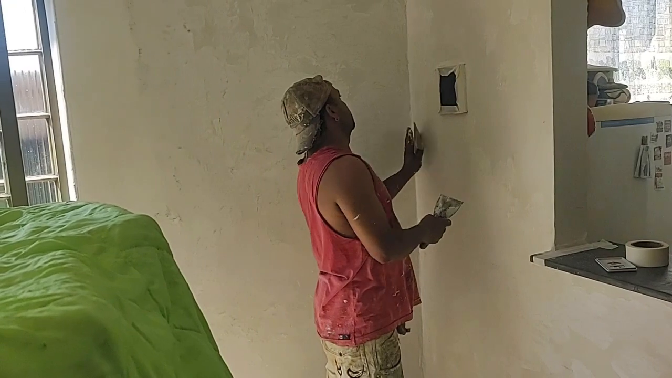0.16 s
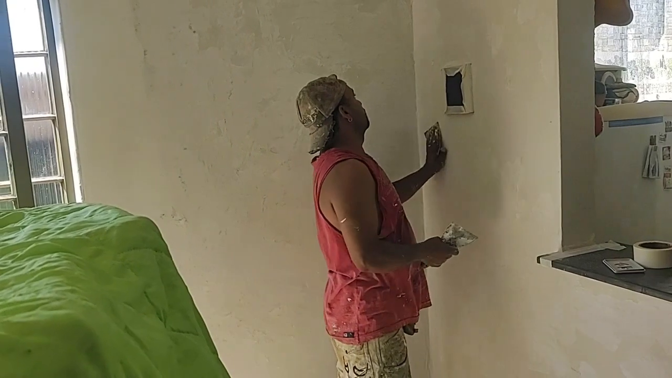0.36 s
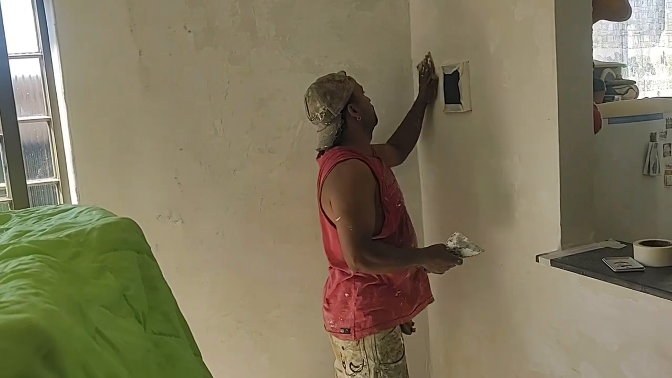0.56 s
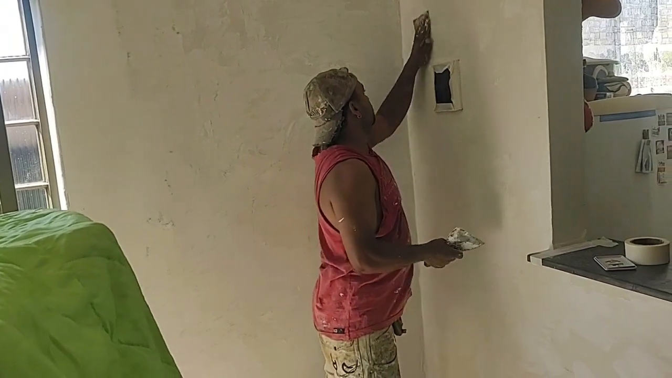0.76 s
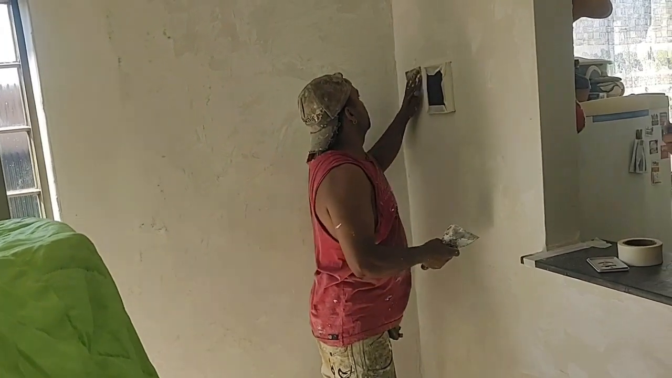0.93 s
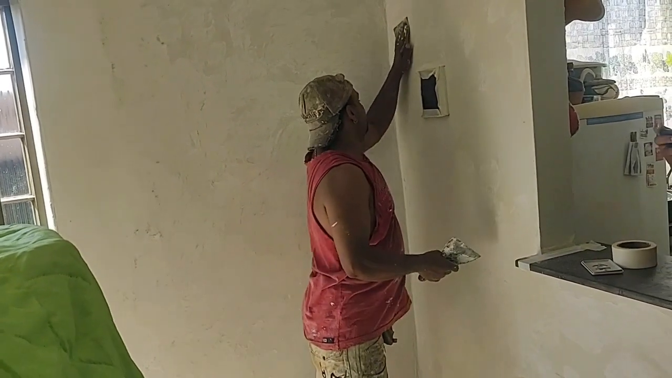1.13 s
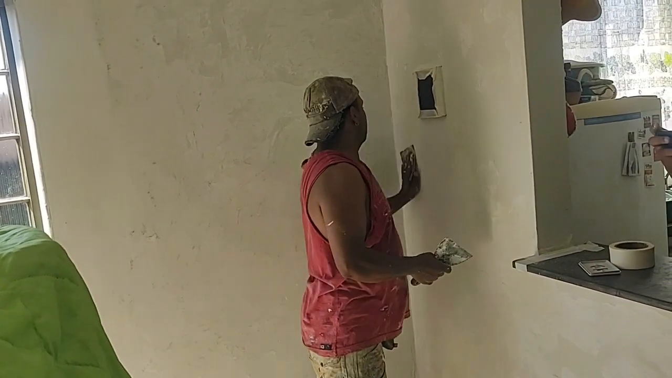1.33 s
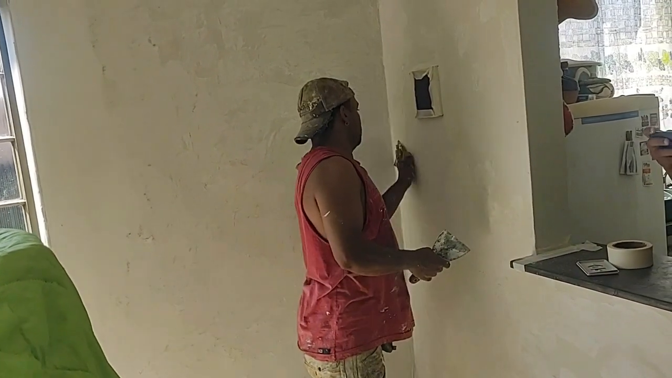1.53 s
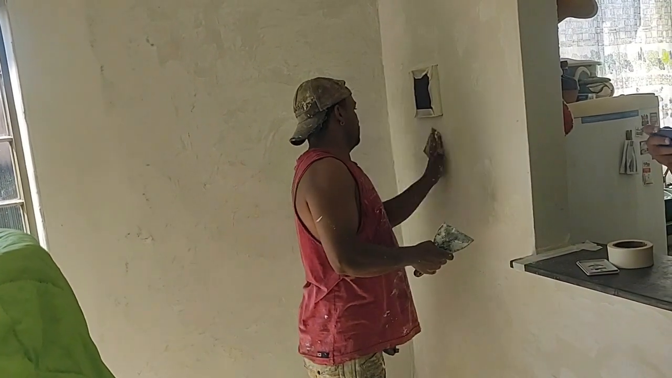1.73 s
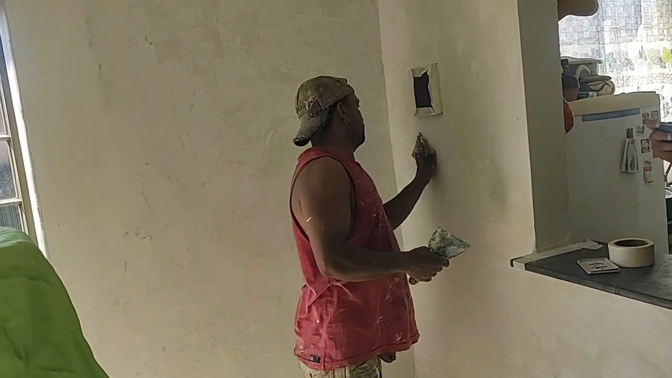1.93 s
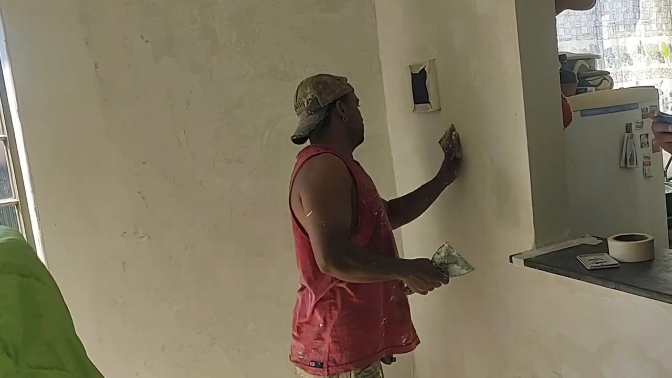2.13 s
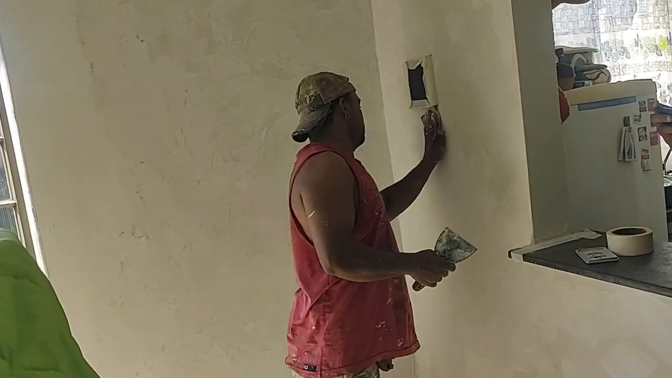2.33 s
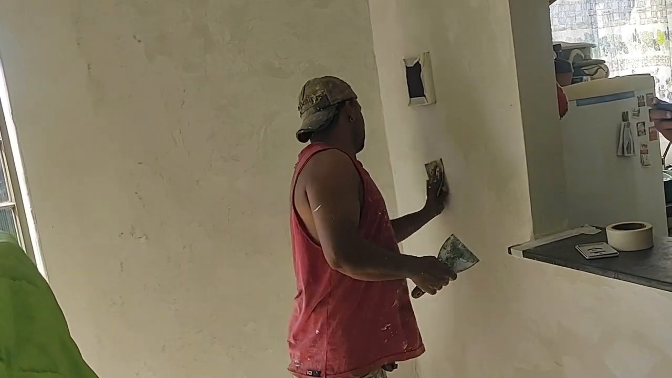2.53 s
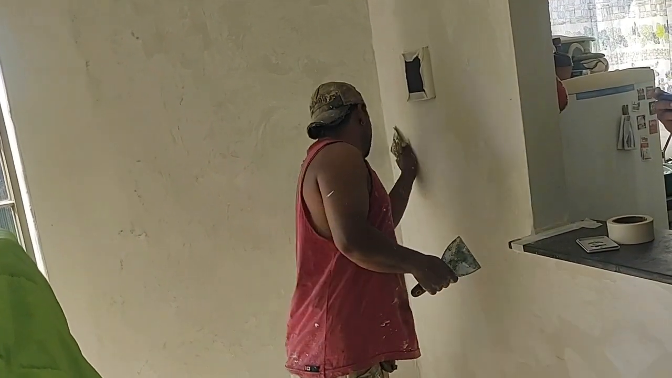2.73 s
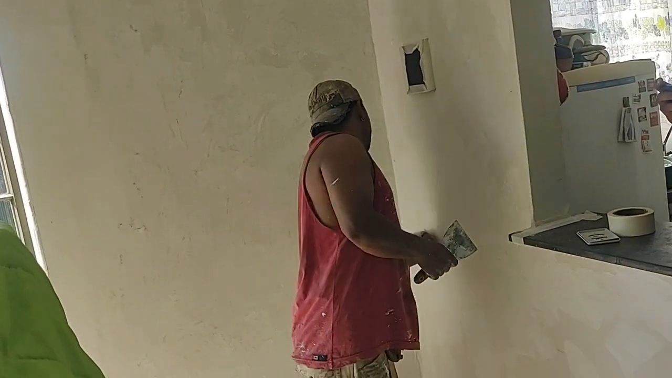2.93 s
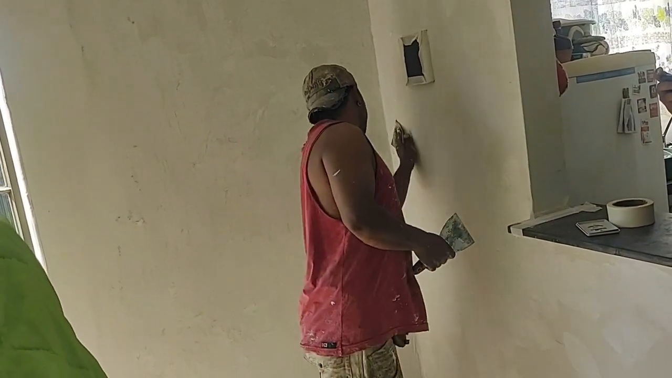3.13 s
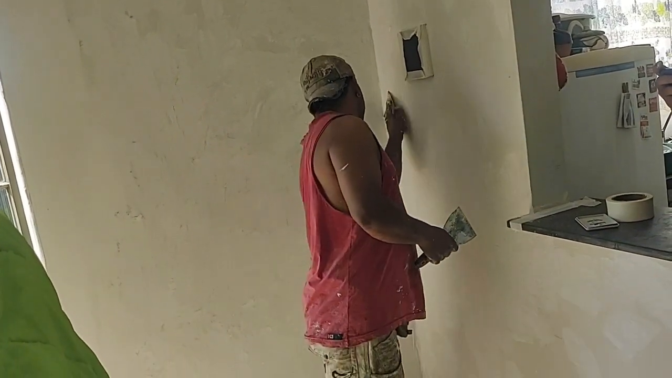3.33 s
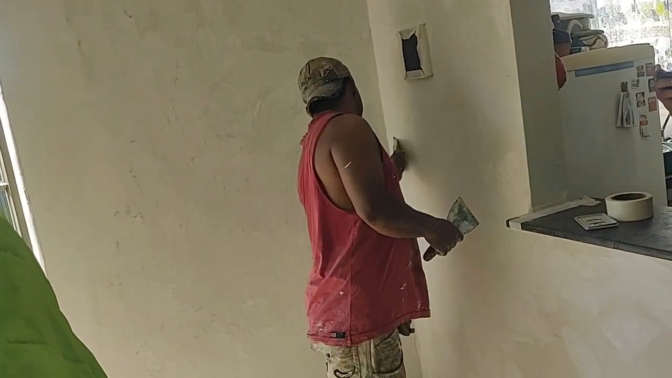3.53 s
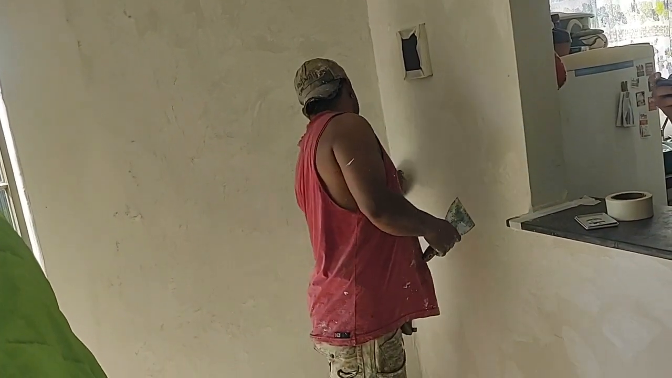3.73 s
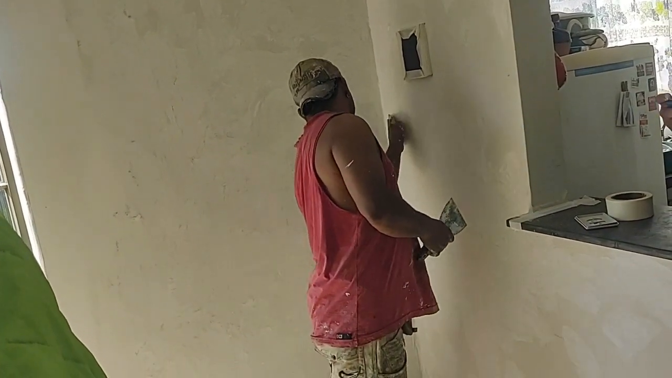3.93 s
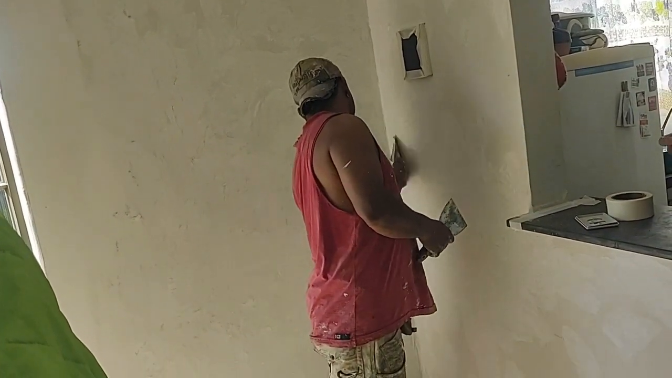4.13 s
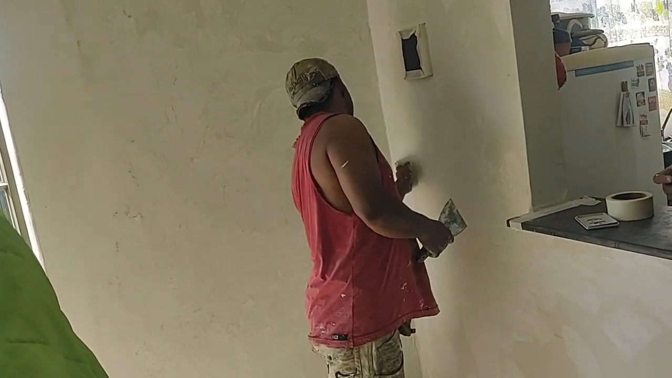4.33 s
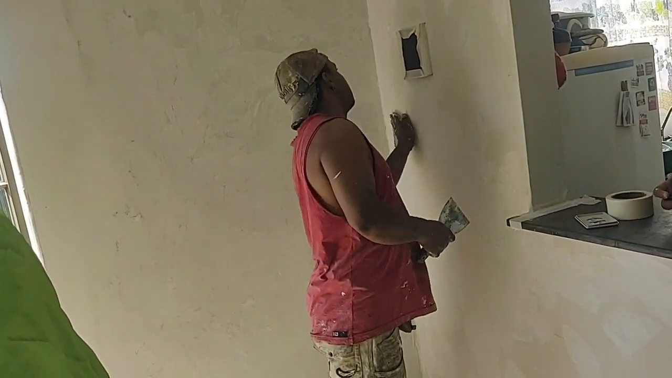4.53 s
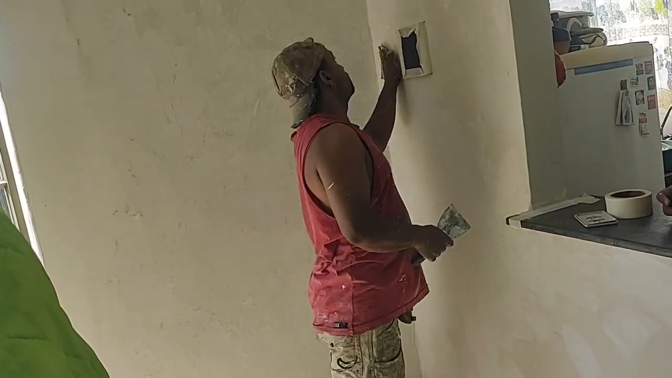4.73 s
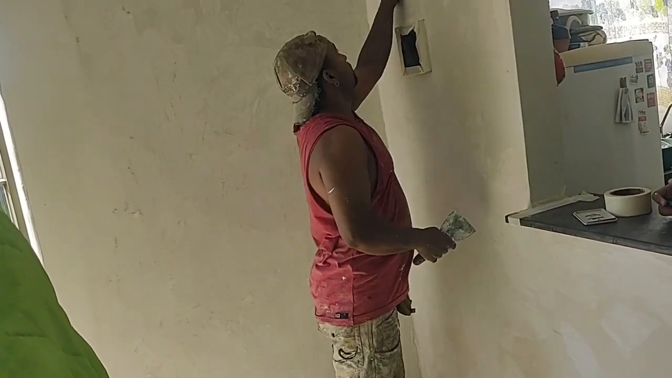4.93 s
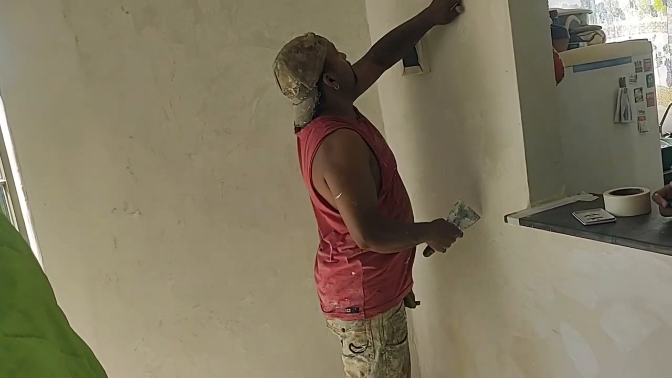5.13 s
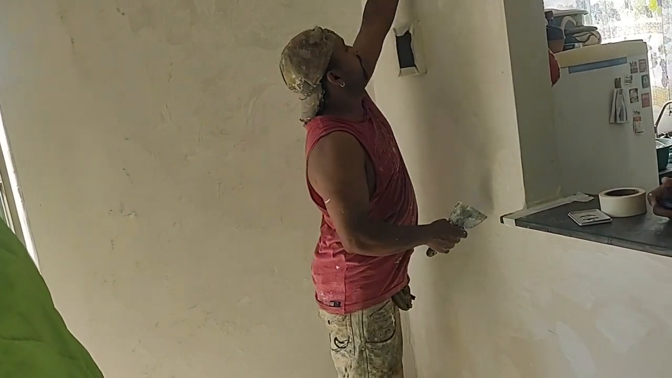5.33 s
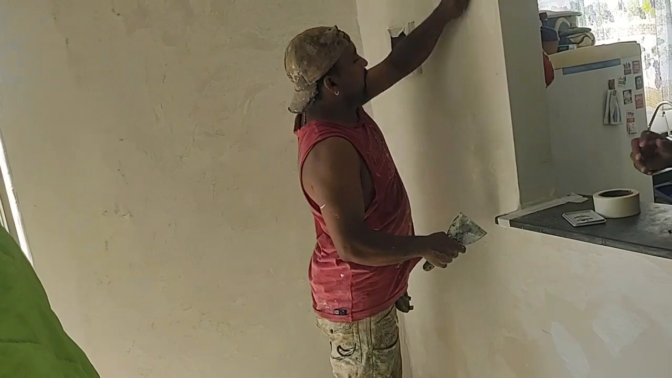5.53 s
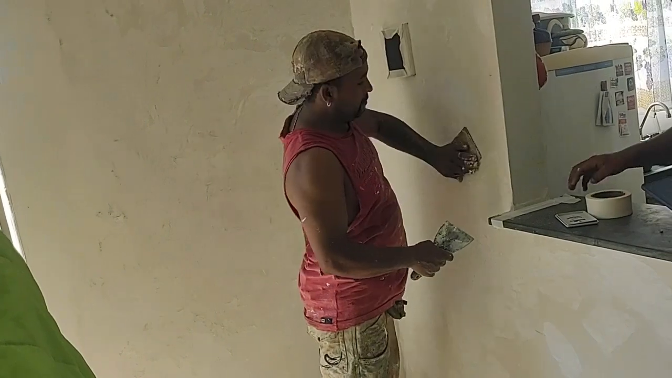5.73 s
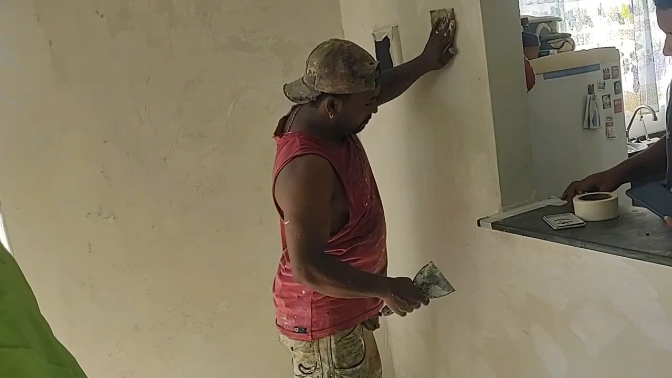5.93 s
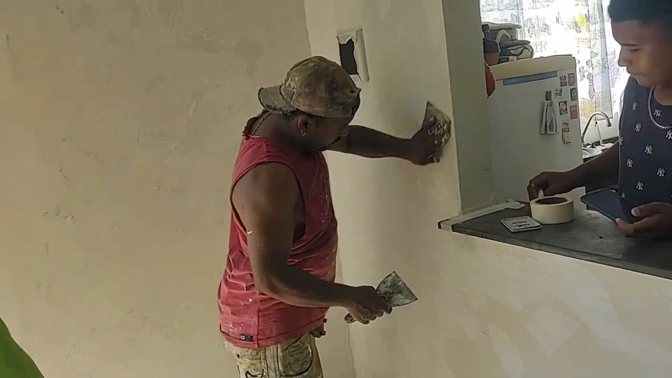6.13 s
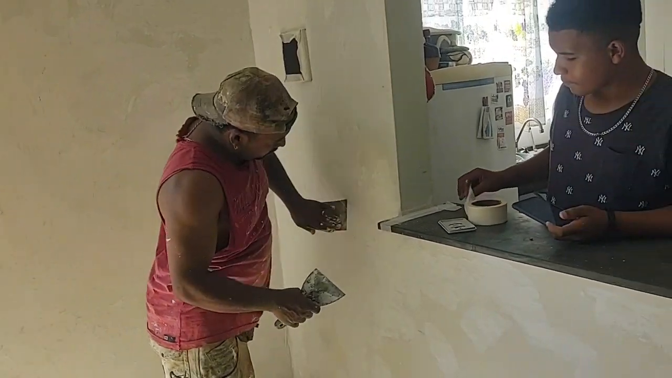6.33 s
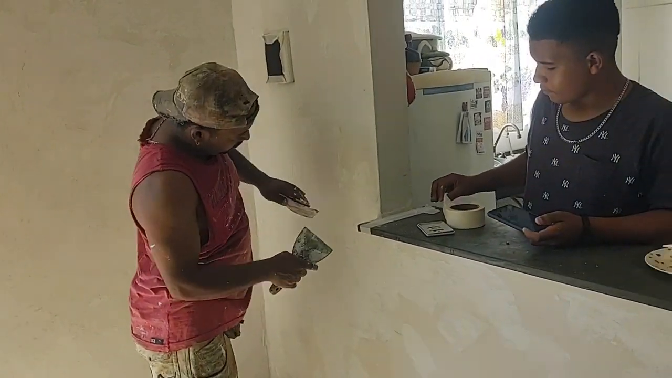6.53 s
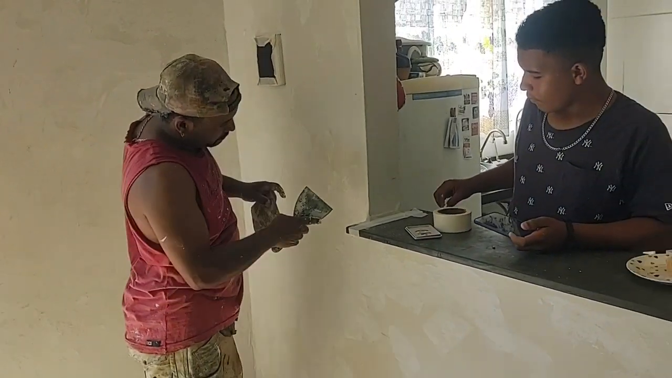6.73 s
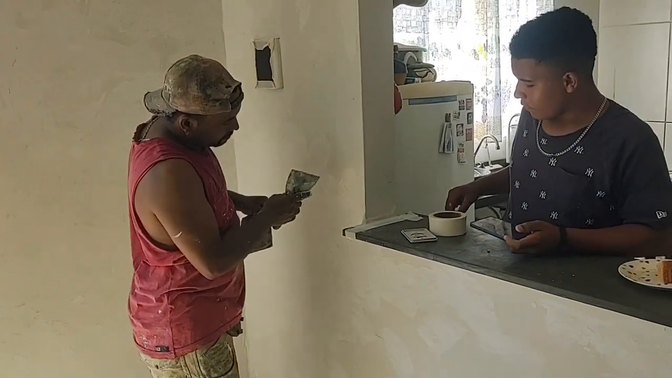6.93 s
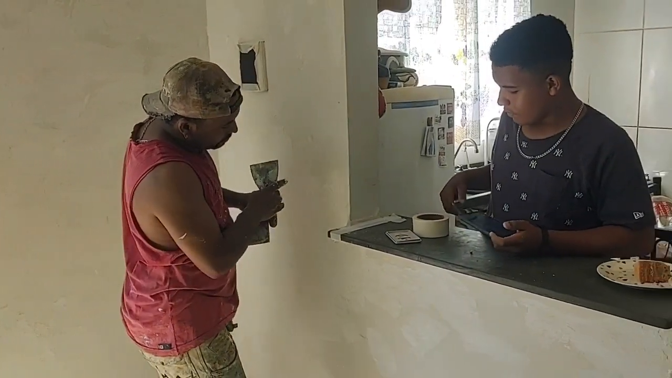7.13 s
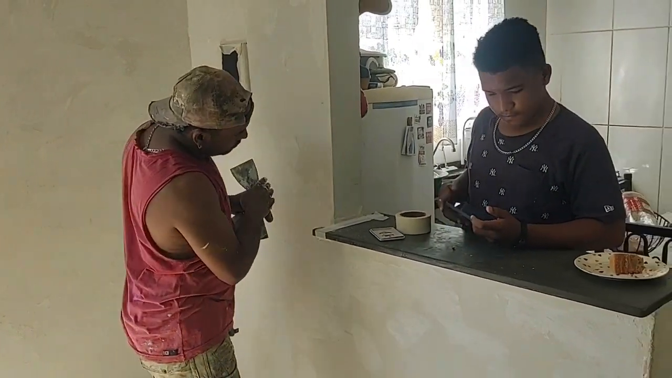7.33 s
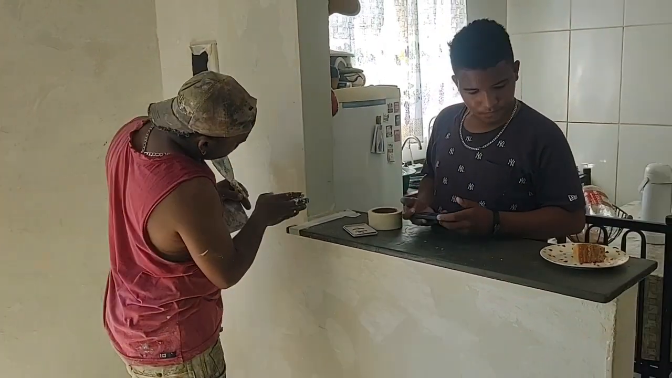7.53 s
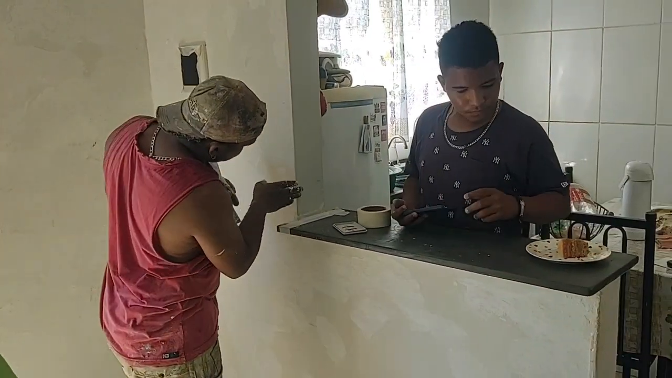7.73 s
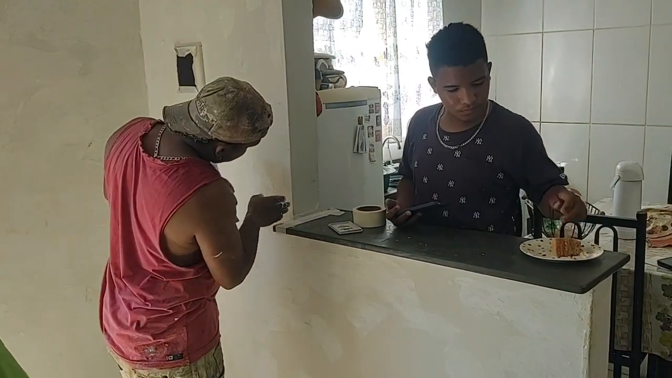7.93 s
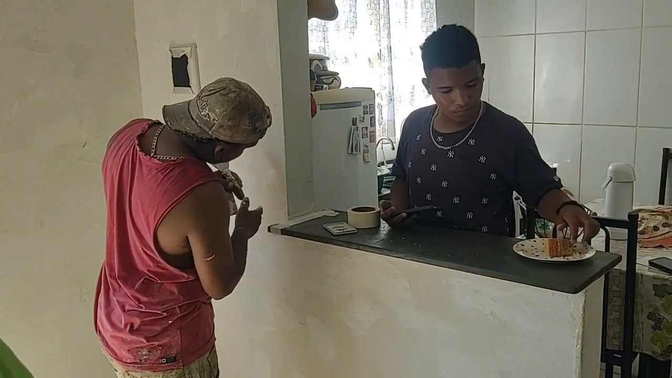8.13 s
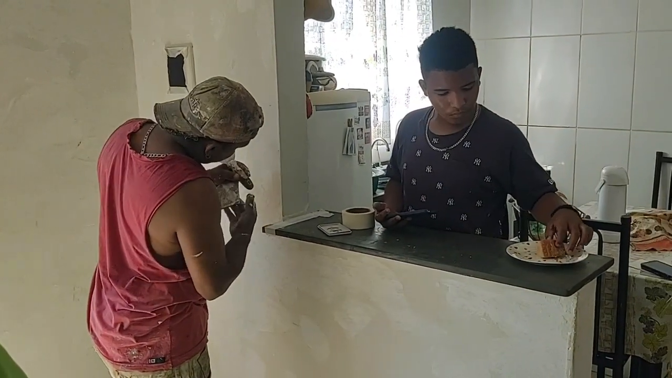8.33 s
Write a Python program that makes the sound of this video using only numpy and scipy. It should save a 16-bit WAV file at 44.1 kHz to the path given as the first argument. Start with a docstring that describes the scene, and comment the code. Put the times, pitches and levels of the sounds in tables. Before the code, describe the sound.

Sandpaper rubbed by hand over a plastered wall in quick gritty strokes, then the sheet crackles and is shaken in a small hard room.

```python
"""Small hard room: a man sands a plastered wall by hand, a few metres from a handheld phone.
Clicks of grit, split into bands, make the strokes; noise bursts make snags; hard pushes drum hollow resonances.
He fingers the sheet (crackle) at the start and after sanding, when he also shakes it.
Low knocks, from fingers bumping the phone and once ringing in the room, are damped sines.
Echoes, a bass boom, faint air and two late whistles complete it."""
import sys
import numpy as np
from scipy import signal
from scipy.fft import rfft, irfft, next_fast_len
from scipy.io import wavfile
from scipy.ndimage import uniform_filter1d

SR = 44100
rng = np.random.default_rng(int(sys.argv[2]) if len(sys.argv) > 2 else 0)


def persist_wave(psi):
    """Save psi, clipped to +-1, as 16-bit WAV."""
    counts = np.round(np.clip(psi, -1, 1) * 32767).astype(np.int16)
    wavfile.write(sys.argv[1], SR, np.atleast_2d(counts).T)


N = 369116

# House air spectrum: [hz, relative_db]
AIR_SPECTRUM = [(18, -38), (30, -11), (102, 0.5), (219, -2.5), (277, -2.5), (455, -6), (1360, -12.5),
                (2910, -9.5), (3490, -11.5), (5040, -14), (15500, -24.5)]
AIR_DB = -71.5
# Fingers shifting on the loose sheet: [start_s, length_s, level_db]
GRIPS = [(0.0, 0.17, -66), (0.263, 0.16, -67.5), (6.43, 0.33, -60), (6.682, .24, -55.5),
         (6.977, 0.26, -59.5), (7.284, 0.22, -63), (7.5, 0.16, -74), (7.82, 0.19, -70.5),
         (8.1, 0.21, -69.5)]
GRIP_RISE_S = 0.03
# Sheet shaken out: [start_s, flap_db, thump_db, rise_s, t60_s, boom_db]
SHAKES = [(6.711, -46, -63, .005, 0.22, -82), (6.906, -43.5, -50.5, 0.00091, 0.47, -55),
          (7.283, -42, -42.5, 0.01, 0.21, -64), (7.334, -76, -61.5, .005, 1, -47),
          (7.53, -79, -54.5, 0.0052, 0.17, -68)]
# Crackle spectrum of the loose sheet: [hz, relative_db]
RUSTLE_SPECTRUM = [(180, -20), (300, -13.5), (360, -20.5), (708, -11.5), (1140, -4.5), (1440, -6.5),
                   (2690, 2.5), (3280, -3.5), (6680, -5.5), (15500, -23)]
# Soft low knocks: fingers bumping the phone, and at 7.529 s one ringing knock in the room:
# [start_s, level_db, pitch_hz, t60_s]
KNOCKS = [(0.101, -26.5, 158, 0.014), (0.185, -45.5, 92, 0.056), (3.149, -24.5, 113, 0.028),
          (3.171, -35, 130, 0.091), (3.226, -23, 160, 0.024), (3.262, -26.5, 94, 0.087),
          (3.321, -41, 140, .12), (3.873, -38, 129, 0.037), (7.529, -51, 323, .25),
          (7.841, -40, 127.6, 0.029)]
# Paper catching on a bump or creasing: [start_s, level_db, ring_hz, ring_share_db]
SNAGS = [ (0.268, -40, 2860, -24), (0.43, -47.5, 1440, -6.5), (0.764, -20.5, 1540, -12),
         (0.912, -22, 1290, -6.5), (0.941, -17, 2470, -10), (1.023, -12, 1440, -21),
         (1.237, -17, 2560, -11), (1.786, -4, 2600, -33), (1.801, -25, 595, -3), (2.128, -31, 1520, -1),
         (2.639, -26, 960, -1.5), (2.756, -20.5, 1140, -1), (2.785, -20, 1540, -3), (2.96, -20.5, 2850, -6),
         (3.217, -16.5, 2250, -15.5), (3.59, -24, 1540, -17.5), (3.597, -44.5, 780, -3),
         (4.006, -43, 1900, -6), (4.581, -39, 1600, -3.5), (4.788, -26.5, 1820, -13),
         (5.062, -32, 2100, 14), (6.719, -41, 2590, -23), (6.984, -33, 7000, -13), ]
# Arm sweeps, turn to turn; last three columns relative to rasp:
# [start_s, length_s, run_up_s, rasp_db, swell_db (start to end), hiss_db, scrape_db, bite_db]
STROKES = [ (0.545, 0.29, 0.067, -34.5, -2.5, 3.5, -14, -4.5),
           (0.796, 0.22, 0.042, -33, -2.5, 2, -10, -4.5), (1.01, 0.2, 0.0092, -34, -4.5, 0.5, -8.5, -5),
           (1.206, 0.097, 0.044, -35.5, 4, 3, -3, -8), (1.283, 0.26, 0.053, -33, -1, 3, -11, -5),
           (1.573, 0.24, 0.055, -39, -13, 4.5, -9.5, -6), (1.72, 0.23, 0.058, -32.5, -6, 1.5, -10, -6.5),
           (1.924, 0.16, .035, -38, -10, 3, -10, -9), (2.11, 0.22, 0.12, -34, -2.5, 2.5, -11, -10.5),
           (2.287, 0.13, 0.036, -33, 11.5, 1, -9.5, -8), (2.436, 0.32, 0.042, -37.5, -0.5, 5, -13.5, -4),
           (2.734, .11, 0.032, -29, -10, 1, -9.5, -8), (2.812, 0.25, 0.026, -36, -7, 4, -13, -5.5),
           (3.035, 0.26, 0.052, -40, 0.5, 4.5, -7.5, -9.5), (3.425, .28, 0.053, -52, 5.5, 3.5, -7, -12),
           (3.879, 0.19, 0.061, -58.5, 1.5, 0, -6, -7), (4.114, 0.19, 0.16, -48.5, 2.5, 3, -13, -12),
           (4.455, 0.17, 0.02, -60.5, -6, -1.5, -37, -3.5), (4.56, 0.44, 0.13, -43, 6, 1, -12.5, -21),
           (4.996, 0.22, 0.042, -28, -0.5, -.5, -19, -10.5), (5.232, 0.2, 0.039, -28, -2.5, 0, -16.5, -2.5),
           (5.445, 0.41, 0.074, -28.5, -1.5, 1.5, -16.5, -5.5),
           (5.882, 0.21, 0.054, -29.5, -13.5, 0, -16, -2.5), (6.127, 0.23, 0.062, -30.5, -12, 5, -13, -4.5),
           ]
# Grit-on-plaster spectrum: [hz, relative_db]
GRIT_SPECTRUM = [(59, -52), (100, -27.5), (166, -23.5), (275, -24), (326, -23.5), (429, -26), (589, -18),
                 (640, -14.5), (1040, -10.5), (1260, -12), (2580, 2.5), (3690, -1), (4660, -4.5),
                 (7410, -7), (15500, -23.5)]
# The hand brakes before each turn: weaker, duller sound
BRAKE_S, TURN_DB, TURN_HISS_DB = 0.067, -11, -1.5
# Past the stroke's ends the sheet is off the wall; loss grows with the square of the excess slowness
LIFT_DB = -2
# Along a stroke the hiss grows with hand speed; the scrape changes slightly against the rasp
HISS_GROWTH_DB, SCRAPE_GROWTH_DB = 3.5, 0.5
# Hard pushes on the wall: [start_s, thud_db, t60_s, boom_db]
PUSHES = [(0.911, -40.5, 0.32, -72), (1.08, -56.5, 0.23, -75), (1.795, -43.5, 0.63, -66),
          (2.41, -55, 0.37, -65), (2.645, -51, 0.22, -62), (2.762, -46.5, 0.79, -39),
          (5.22, -57, 0.14, -63.5), (6.132, -44.5, 0.37, -70), (6.206, -34, 0.083, -54.5)]
# Hollow resonances of wall and corner: [hz, width_hz, relative_db]
HOLLOWS = [(100, 27, -11), (156, 21, 4.5), (256, 48, -1.5), (323, 53, -1.5), (495, 75, -6.5),
           (647, 80, -10), (970, 340, -11.5)]
BOOM_HZ, BOOM_T60_S = 86, 0.5
# Faint high whistles: [start_s, length_s, pitch_hz, level_db]
WHISTLES = [(7.68, 0.15, 4730, -72.5), (7.853, 0.13, 6150, -70)]
# Colour difference of the two microphone ports: [hz, left_minus_right_db]
PORTS = [(100, -2), (500, -1), (1300, -2), (2600, -6), (3300, -1), (4000, 5), (7200, 6), (8700, 8.5),
         (10500, 8.5), (15000, 8)]
# Resonance subtracted from the right port
NOTCH_HZ, NOTCH_WIDTH_HZ, NOTCH_SHARE_DB = 13000, 2200, -1.5
TOP_HZ = 15800


def undb(db):
    """Decibels to gain."""
    return 10 ** (np.asarray(db) / 20)


def unit(x):
    """Scale to rms 1."""
    return x / np.sqrt(np.mean(x ** 2))


def colour(x, points):
    """Minimum-phase filter through (hz, db) points, built by folding the cepstrum."""
    size = 4096
    hz, db = np.transpose(points)
    f = np.maximum(np.fft.rfftfreq(size, 1 / SR), 1)
    response_db = np.interp(np.log(f), np.log(hz), db)
    cepstrum = irfft(np.log(undb(response_db)))
    cepstrum[1:size // 2] *= 2
    cepstrum[size // 2 + 1:] = 0
    impulse = irfft(np.exp(rfft(cepstrum)))
    return signal.fftconvolve(x, impulse)[:len(x)]


def band(x, hz, kind, order=3):
    """Butterworth filter."""
    return signal.sosfilt(signal.butter(order, hz, kind, fs=SR, output="sos"), x)


def resonance(x, hz, width_hz, db):
    """One band-pass resonance."""
    return undb(db) * signal.lfilter(*signal.iirpeak(hz, hz / width_hz, fs=SR), x)


def fade(t, t60_s):
    """Exponential decay, 60 dB in t60_s."""
    return np.exp(-np.log(1000) * t / max(t60_s, 1e-3))


def add(out, start_s, x):
    """Mix x into out from start_s."""
    i = max(int(start_s * SR), 0)
    out[i:i + len(x)] += x[:N - i]


def swells(rows):
    """Envelope of (start_s, level_db, rise_s, t60_s) bursts that rise and die away."""
    out, t = np.zeros(N), np.arange(SR) / SR
    for start_s, db, rise_s, t60_s in rows:
        rise = 1 - np.exp(-t / max(rise_s, 1e-4))
        add(out, start_s, undb(db) * rise * fade(t, t60_s))
    return out


def walk(rate_hz):
    """Random levels slewed from one to the next at rate_hz; spread near 1."""
    k = max(int(SR / rate_hz), 1)
    steps = np.repeat(rng.standard_normal(N // k + 1), k)
    return unit(uniform_filter1d(steps, k))[:N]


def grains(per_s, spread_db):
    """Dense random clicks, most small and a few large; rms 1."""
    hit = rng.random(N) < per_s / SR
    size = undb(spread_db * np.minimum(rng.exponential(size=N), 5))
    return unit(hit * size * rng.standard_normal(N))


def slowness(start_s, length_s, run_up_s):
    """Hand's lack of speed: 0 in mid-move, 1 at both ends, more outside."""
    t = np.arange(N) / SR - start_s
    running_up = 1 - t / max(run_up_s, 0.003)
    braking = 1 + (t - length_s) / BRAKE_S
    return np.clip(np.maximum(running_up, braking), 0, 8)


def air(waver_db=1):
    """Faint house noise, gently wavering, partly shared by the ports."""
    shared = rng.standard_normal(N)
    sides = [unit(colour(shared + rng.standard_normal(N), AIR_SPECTRUM)) for _ in range(2)]
    return np.array(sides) * undb(AIR_DB + waver_db * walk(3.8))


def handling(rustle_db=-4.0, flap_db=0, ease_db=-11):
    """The loose sheet crinkles between the fingers and flaps when shaken: coloured clicks."""
    rustle = 0
    for start_s, length_s, db in GRIPS:
        slow = slowness(start_s, length_s, GRIP_RISE_S)
        rustle = rustle + undb(db + rustle_db + ease_db * slow)
    flaps = swells([(s, db + flap_db, rise_s, t60_s) for s, db, _, rise_s, t60_s, _ in SHAKES])
    crackle = unit(colour(grains(per_s=3300, spread_db=3), RUSTLE_SPECTRUM))
    return crackle * np.hypot(rustle, flaps)


def knocks(left_db=-20, rise_s=0.0014):
    """Soft low knocks of phone bumps and one ringing room knock: damped sines, far louder on the right."""
    out, t = np.zeros(N), np.arange(SR // 4) / SR
    rise = 1 - np.exp(-t / rise_s)
    for start_s, db, hz, t60_s in KNOCKS:
        add(out, start_s, undb(db) * np.sin(2 * np.pi * hz * t) * fade(t, t60_s) * rise)
    return band(out, [65, 380], "band", order=2) * undb(np.array([[left_db], [0]]))


def snags(ring_t60_s=0.049, ring_q=4, crack_db=-9, crack_t60_s=0.018):
    """A short run of slips (noise) cracks and rings the cupped sheet."""
    out, t = np.zeros(N), np.arange(SR // 4) / SR
    for start_s, db, hz, ring_db in SNAGS:
        slips = rng.standard_normal(len(t))
        narrow = resonance(slips, hz, hz / ring_q, 0)
        ring = unit(resonance(narrow, hz, hz / 2, 0)) * fade(t, ring_t60_s)
        crack = unit(band(slips, [900, 7000], "band", order=2)) * fade(t, crack_t60_s)
        add(out, start_s, undb(db) * (undb(ring_db) * ring + undb(crack_db) * crack))
    return out


def arm():
    """Stroke gains (rasp, hiss, scrape, bite, catches): run up, hold, brake; overlaps add in power."""
    power, t = np.zeros((5, N)), np.arange(N) / SR
    for start_s, length_s, run_up_s, db, swell_db, hiss_db, scrape_db, bite_db in STROKES:
        near = slice(max(int((start_s - 0.2) * SR), 0), int((start_s + length_s + 0.3) * SR))
        slow = slowness(start_s, length_s, run_up_s)[near]
        along = np.clip((t[near] - start_s) / length_s, 0, 1) - 0.5
        lift = LIFT_DB * np.maximum(slow - 1, 0) ** 2
        rasp = db + swell_db * along + TURN_DB * slow + lift
        hiss = hiss_db + HISS_GROWTH_DB * along + TURN_HISS_DB * slow
        scrape = scrape_db + SCRAPE_GROWTH_DB * along
        levels_db = [rasp, rasp + hiss, rasp + scrape, rasp + bite_db + hiss / 2, rasp + scrape / 2]
        power[:, near] += undb(levels_db) ** 2
    return np.sqrt(power)


def catches(low_hz=1400, high_hz=3300, cycles=26, spread_db=1.2, count=700):
    """Single coarse grains catch and let go, each plucking the sheet at its own pitch."""
    out, t = np.zeros(N), np.arange(SR // 20) / SR
    for when, pitch, size in rng.random((count, 3)):
        hz = low_hz * (high_hz / low_hz) ** pitch
        gain = undb(spread_db * min(-np.log(1 - size), 4))
        add(out, when * N / SR, gain * np.sin(2 * np.pi * hz * t) * fade(t, cycles / hz))
    return unit(out)


def sanding(scrape_hz=1300, bite_hz=3500, hiss_hz=5300, scrape_db=-4.5, rasp_db=-1.0, hiss_db=1,
            catch_db=-6.0, judder_db=0.66, patchy_db=0.21):
    """Grit ploughs the plaster: mid rasp and bite, low scrape from pressure, hiss from speed."""
    rasp_gain, hiss_gain, scrape_gain, bite_gain, catch_gain = arm()
    # stick-slip bunches the scratches; plaster has rougher and smoother patches
    unevenness_db = judder_db * walk(130) + patchy_db * walk(30)
    grit = colour(grains(per_s=12000, spread_db=3.5) * undb(unevenness_db), GRIT_SPECTRUM)
    scrape = unit(band(grit, scrape_hz, "low", order=4)) * undb(scrape_db) * scrape_gain
    rasp = unit(band(grit, [scrape_hz, bite_hz], "band", order=4)) * undb(rasp_db) * rasp_gain
    bite = unit(band(grit, [bite_hz, hiss_hz], "band", order=4)) * bite_gain
    hiss = unit(band(grit, hiss_hz, "high", order=6)) * undb(hiss_db) * hiss_gain
    # more pressure makes coarse grains catch harder
    plucks = band(catches(), 1000, "high") * undb(catch_db) * catch_gain
    return scrape + rasp + bite + hiss + plucks


def drumming(sharp_rise_s=0.003, soft_rise_s=0.0086):
    """The hand judders on the wall or thumps the sheet; hollow resonances answer."""
    pushes = swells([(s, db, sharp_rise_s, t60_s) for s, db, t60_s, _ in PUSHES])
    thumps = swells([(s, db, rise_s + soft_rise_s, t60_s) for s, _, db, rise_s, t60_s, _ in SHAKES])
    judder = grains(per_s=1500, spread_db=2.0)
    body = 0
    for k, (hz, width_hz, db) in enumerate(HOLLOWS):
        body = body + (-1) ** k * resonance(judder, hz, width_hz, db)  # alternating polarity
    return unit(band(body, 75, "high", order=2)) * (pushes + thumps)


def boom(rise_s=0.016, waver=0.05):
    """Pushes and shakes set the room's bass resonance ringing, a little unsteadily."""
    out, t = np.zeros(N), np.arange(SR) / SR
    envelope = fade(t, BOOM_T60_S) * (1 - np.exp(-t / rise_s))
    for start_s, *_, db in PUSHES + SHAKES:
        phase = 2 * np.pi * np.cumsum(BOOM_HZ * (1 + waver * walk(45)[:SR])) / SR
        add(out, start_s, undb(db) * np.sin(phase) * envelope)
    return out


def whistles(waver=0.0049):
    """Thin, slightly unsteady tones: sines with wandering pitch."""
    out = np.zeros(N)
    for start_s, length_s, hz, db in WHISTLES:
        n = int(length_s * SR)
        phase = 2 * np.pi * np.cumsum(hz * (1 + waver * walk(90)[:n])) / SR
        add(out, start_s, undb(db) * np.hanning(n) * np.sin(phase))
    return out


def echoes(early_db=-2, tail_db=-7, early_t60_s=0.097, mid_t60_s=0.39, high_t60_s=0.21,
           shared_hz=800, apart=0.44):
    """One spot's response at both ports: a rush from the corner, then a tail losing treble first."""
    t = np.arange(SR // 2) / SR
    own = rng.standard_normal((2, len(t)))
    # long waves reach both ports nearly alike
    long_waves = band(rng.standard_normal(len(t)) + apart * own, shared_hz, "low", order=1)
    rays = long_waves + band(own, shared_hz, "high", order=1)
    early = rays * fade(t, early_t60_s) * (t > 0.002)
    dull = band(rays, 3800, "low", order=1)
    tail = (dull * fade(t, mid_t60_s) + (rays - dull) * fade(t, high_t60_s)) * (t > 0.02)
    early = undb(early_db) * early / np.linalg.norm(early[0])
    return early + undb(tail_db) * tail / np.linalg.norm(tail[0])


def room(x, direct_db=-8, spots_per_s=130, count=14):
    """The hand travels the wall: its sound crossfades through a cycle of echo patterns."""
    place = np.arange(N) / SR * spots_per_s % count
    size = next_fast_len(N + SR // 2, real=True)
    heard = 0
    for spot in range(count):
        gap = np.abs(place - spot)
        distance = np.minimum(gap, count - gap)
        share = np.sin(np.pi / 2 * np.maximum(1 - distance, 0))
        heard = heard + rfft(x * share, size) * rfft(echoes(), size)
    return undb(direct_db) * x + irfft(heard, size)[:, :N]


def scene():
    """Hand sounds pass through the room into two ports of unequal colour; knocks and air are added."""
    left, right = room(sanding() + snags() + handling() + drumming()) + boom() + whistles()
    # right port is a little further from the hand: one sample
    right = np.roll(right, 1)
    left = colour(left, [(hz, db / 2) for hz, db in PORTS])
    notched = right - resonance(right, NOTCH_HZ, NOTCH_WIDTH_HZ, NOTCH_SHARE_DB)
    right = colour(notched, [(hz, -db / 2) for hz, db in PORTS])
    return np.array([left, right]) + knocks() + air()


def record(dry):
    """The phone cuts off the highest treble: steep elliptic low-pass."""
    return signal.sosfilt(signal.ellip(10, 0.2, 75, TOP_HZ, fs=SR, output="sos"), dry)


dry = scene()
out = record(dry)
persist_wave(out)
```